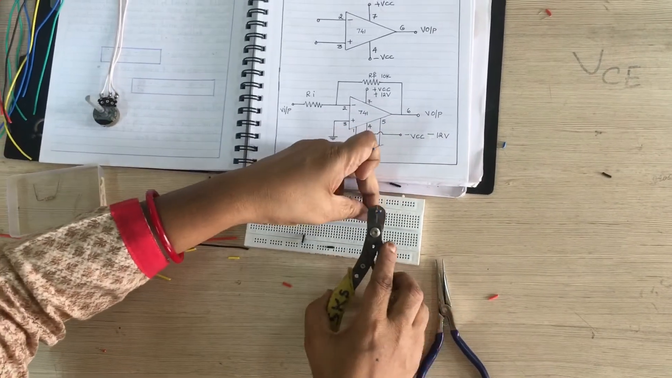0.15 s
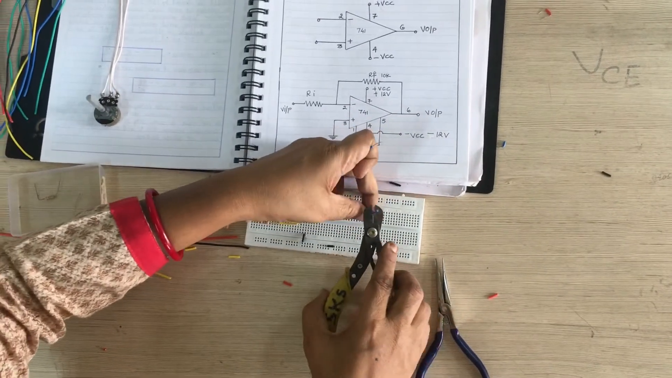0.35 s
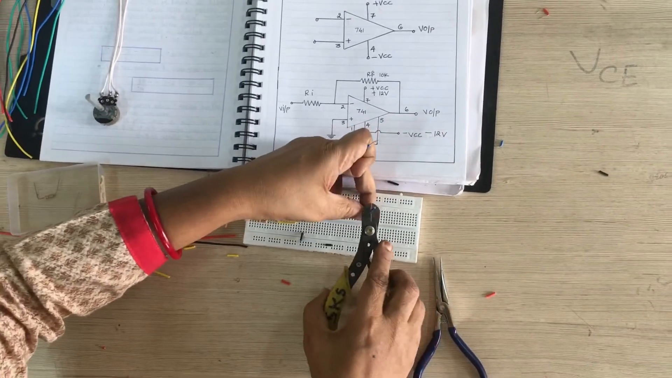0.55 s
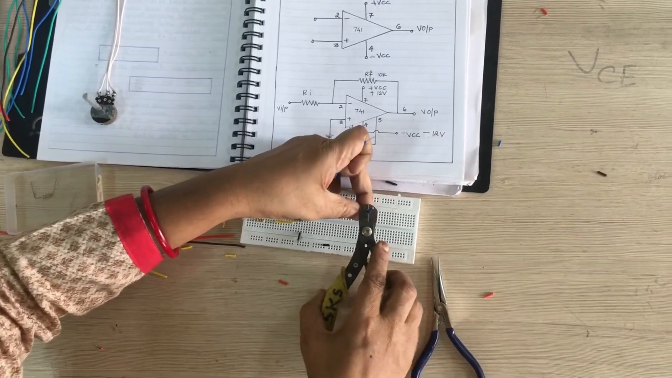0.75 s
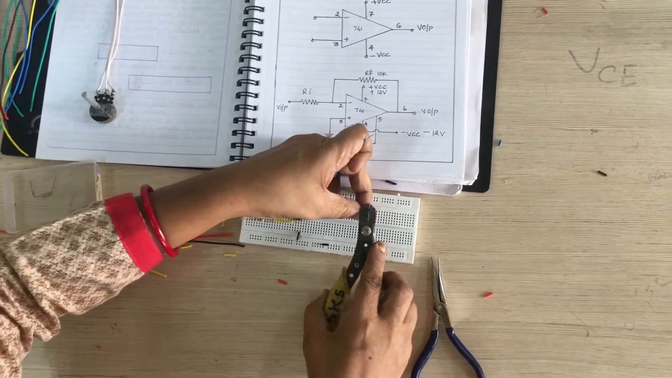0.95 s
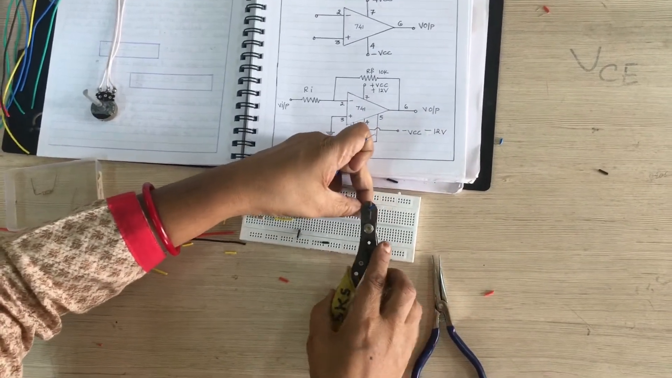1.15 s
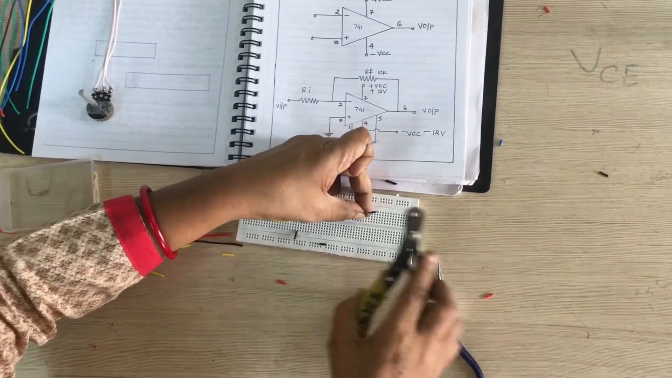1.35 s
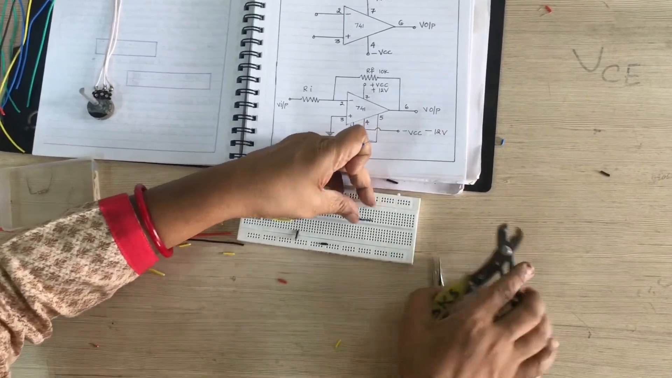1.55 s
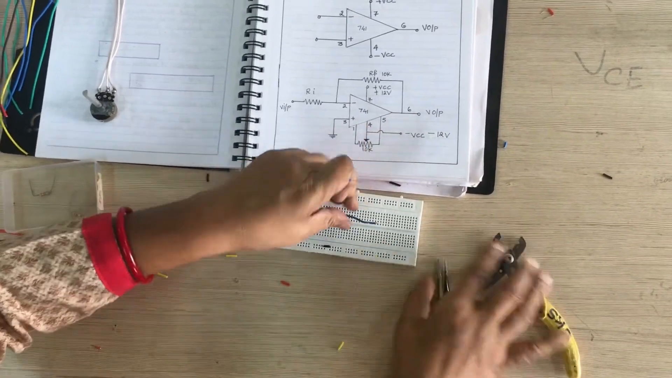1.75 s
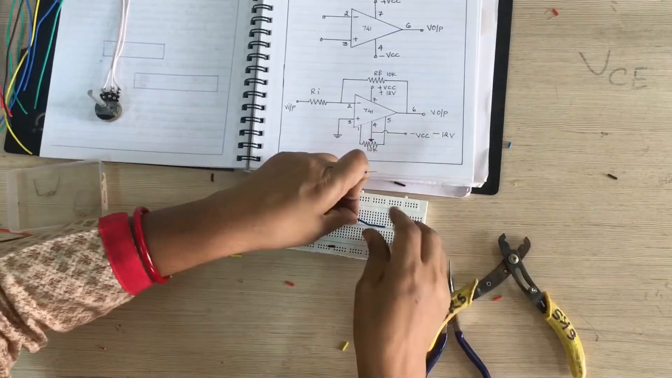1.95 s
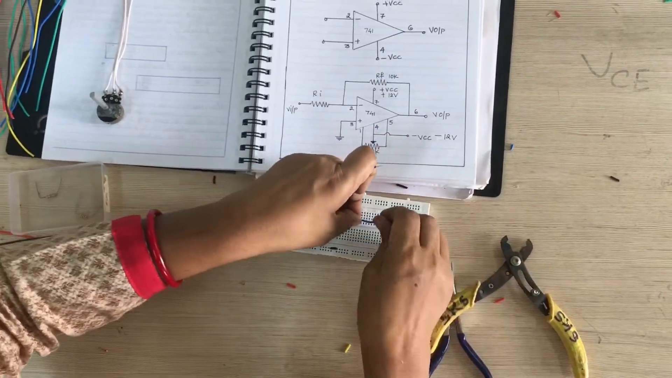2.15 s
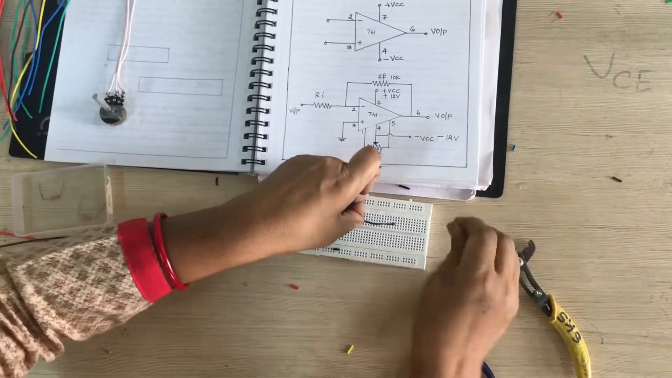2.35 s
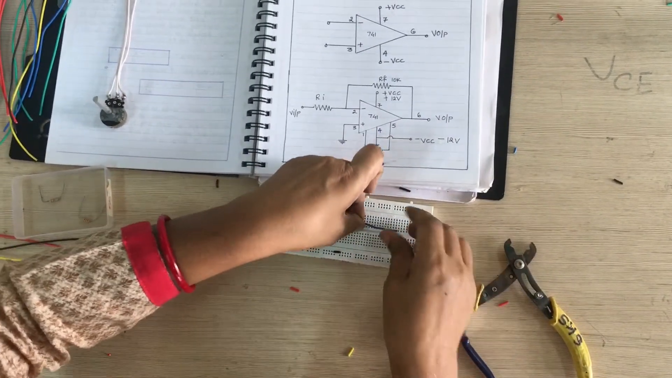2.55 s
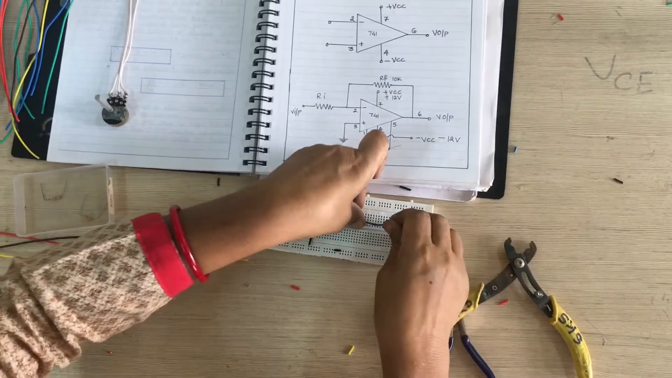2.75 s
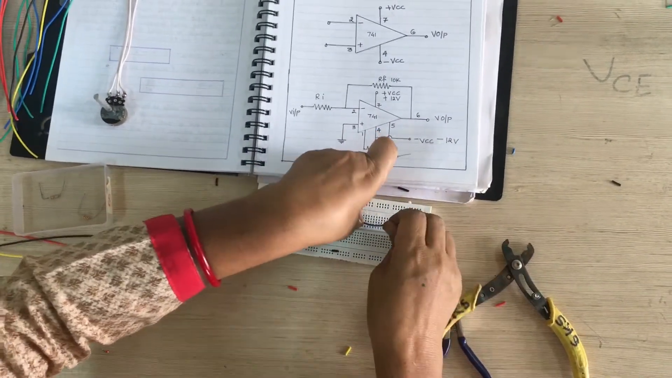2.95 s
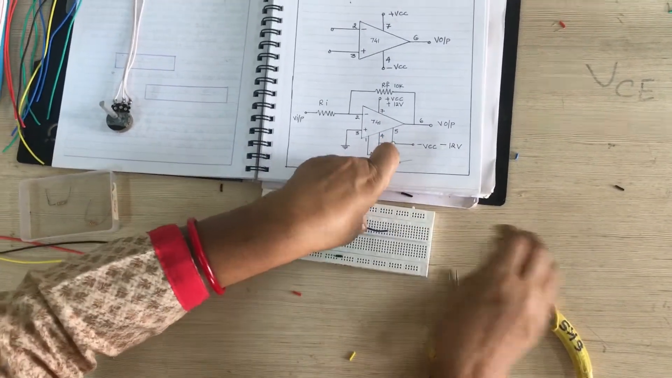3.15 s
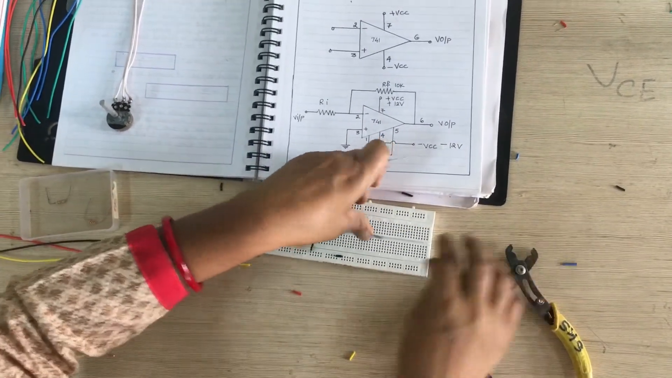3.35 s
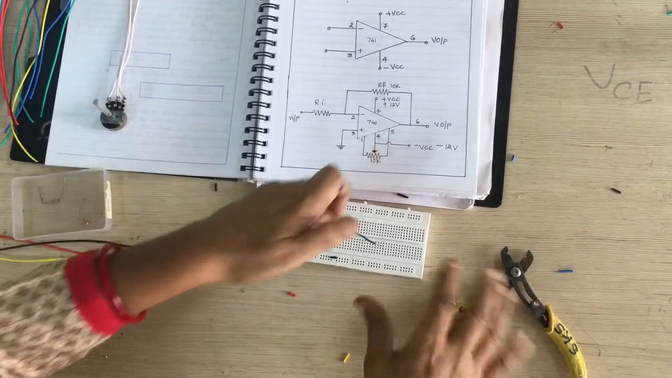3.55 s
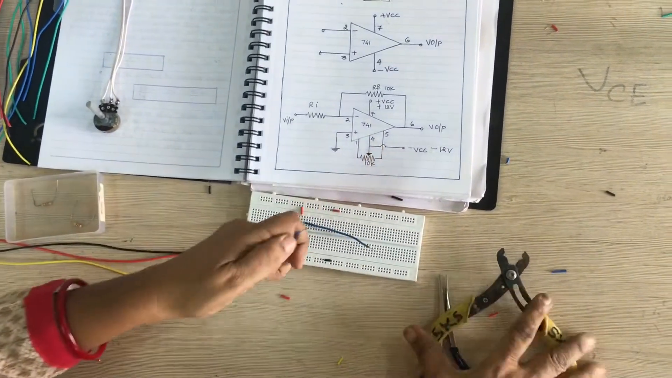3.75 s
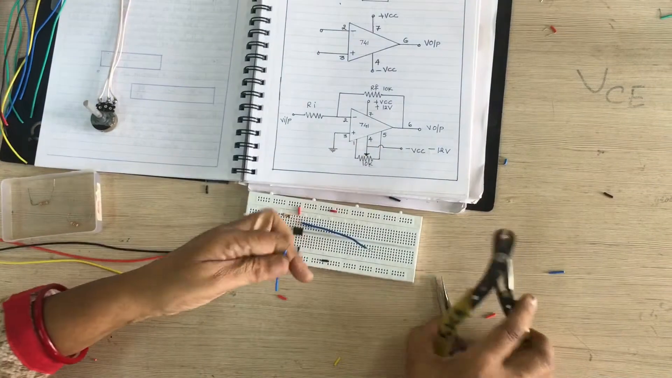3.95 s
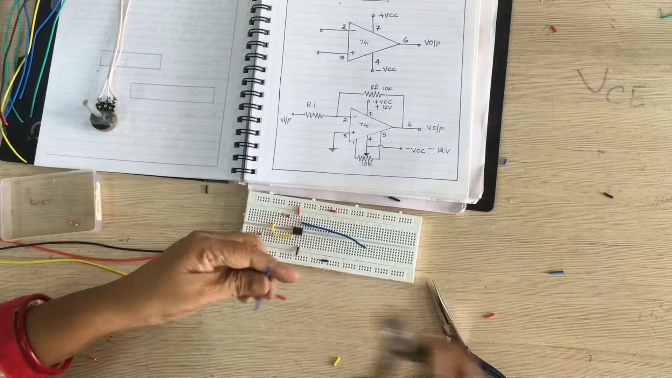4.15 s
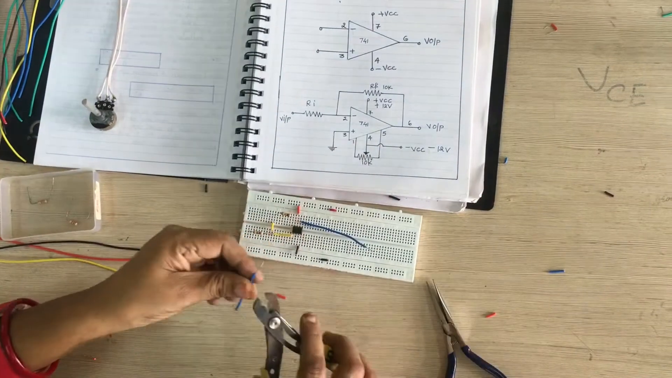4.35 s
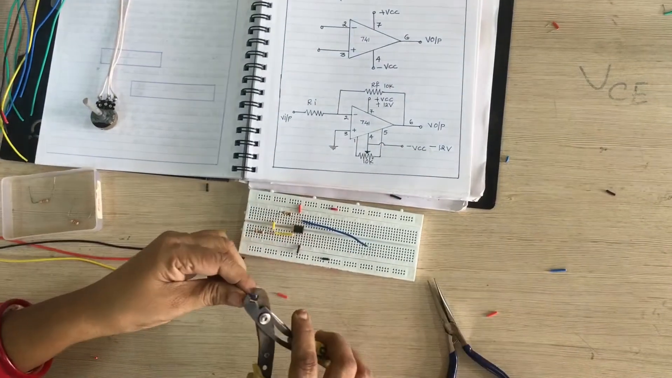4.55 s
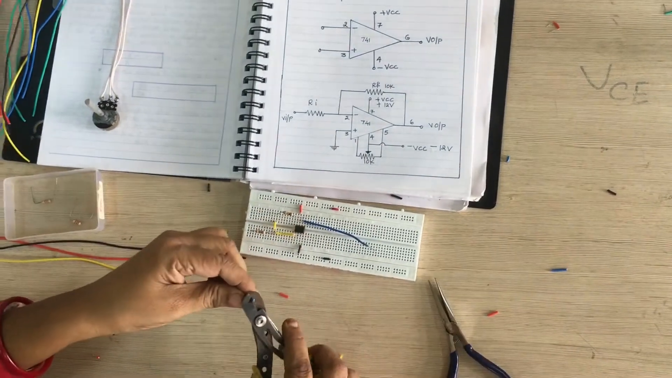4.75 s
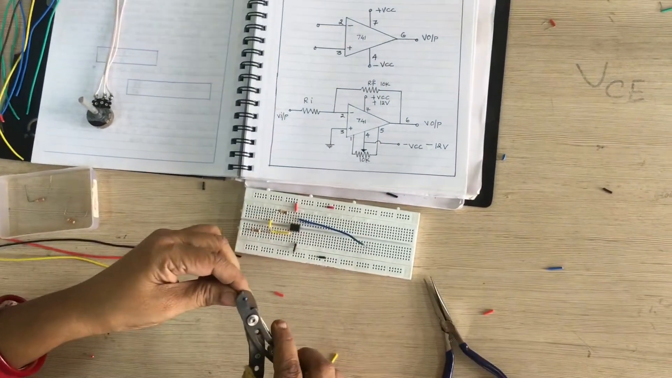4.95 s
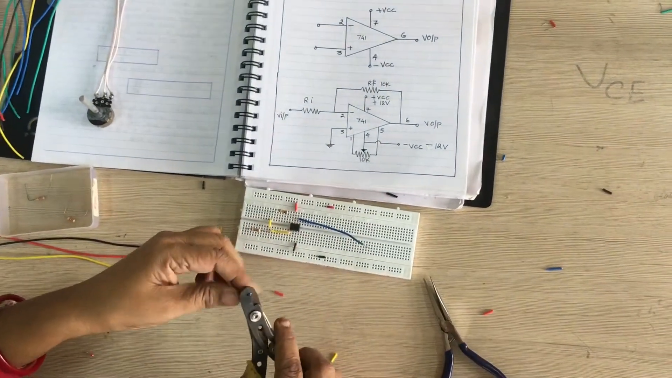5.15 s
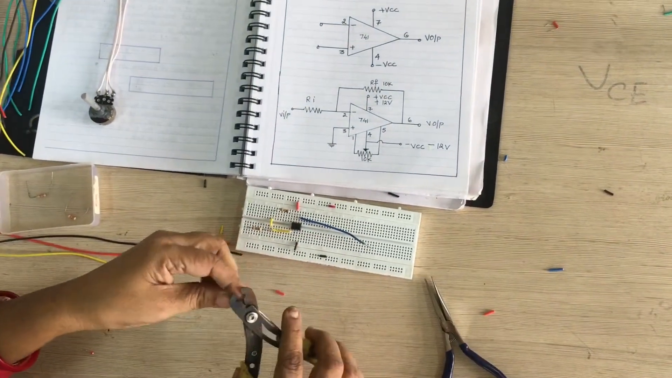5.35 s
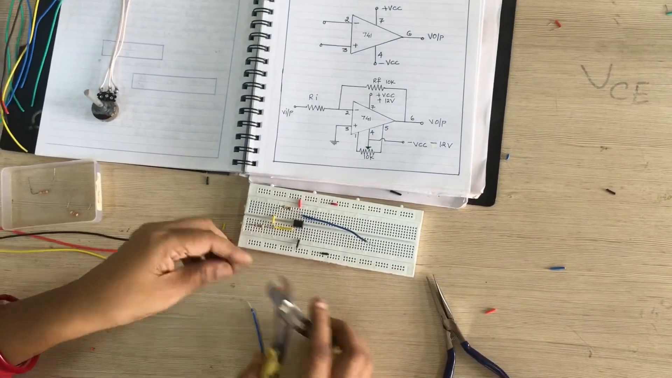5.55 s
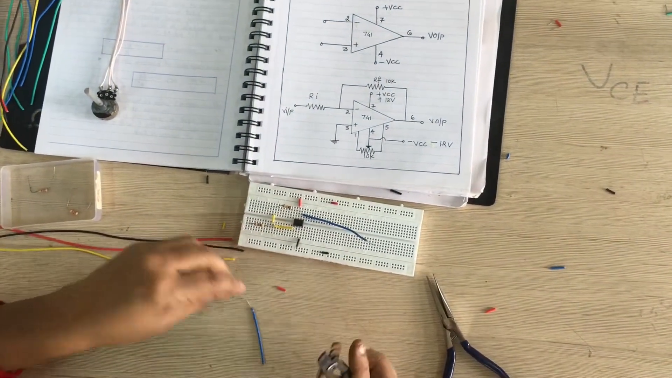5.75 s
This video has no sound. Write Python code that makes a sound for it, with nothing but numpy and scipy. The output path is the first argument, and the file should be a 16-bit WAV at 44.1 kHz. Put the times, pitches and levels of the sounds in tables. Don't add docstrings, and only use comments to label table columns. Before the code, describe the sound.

In an echoing room with a steady fan, a hand tool clatters onto wood, is handled and picked up, then snips wire as a distant horn sounds.

```python
import sys
import numpy as np
from scipy import signal
from scipy.fft import rfft, irfft
from scipy.io import wavfile
from scipy.ndimage import uniform_filter1d, map_coordinates

SR = 44100
rng = np.random.default_rng(int(sys.argv[2]) if len(sys.argv) > 2 else 0)


def wav_record(signal):
    frames = np.transpose(np.atleast_2d(signal))
    bounded = np.clip(frames, -1, 1)
    quanta = np.round(bounded * 32767).astype(np.int16)
    wavfile.write(sys.argv[1], SR, quanta)


def convert_level_to_amplitude(level_db):
    exponent = np.asarray(level_db, float) / 20
    return 10 ** exponent


N = 259749

# (frequency [Hz], level [dB per Hz])
FAN_SPECTRUM = [(20, -59), (32, -39), (40, -7), (50, -26), (62, -15), (75, 4.5), (88, -7), (115, -4.5),
                (130, -4), (160, -7.5), (215, -14.5), (260, -14), (330, -17.5), (1500, -29)]
# (frequency [Hz], level [dB per Hz])
HISS_SPECTRUM = [(880, -61), (1500, -3), (2090, -5), (2500, -10), (2940, -13.5), (3810, -16), (4800, -21.5),
                 (5700, -20), (7700, -23.5), (8950, -21.5), (10200, -26.5), (11600, -23.5), (15100, -28),
                 (16000, -24), (16500, -54)]
# (multiple of the fundamental [1], level [dB])
HORN_PARTIALS = [(8, 0.5), (9, -8), (10, -9)]
# (peak time [s], level [dB], rise [s], fall [s])
HORN_BLASTS = [
    (5.268, -68, .06, .15),
    (5.33, -64, .12, .1),
    (5.382, -59, .1, .1),
    (5.466, -62, .05, .11),
    (5.6, -73, .15, 0.16),
    (5.724, -74, .04, .08),
]
# (peak time [s], level [dB], rise [s], fall [s])
RUBS = [(1.2, -66, .04, .07), (1.37, -70, .05, 0.5), (2.16, -69, .065, .1), (3.094, -55.5, .022, .022),
        (3.24, -68, .055, .15), (3.732, -57, .03, .08), (3.79, -65, .14, .3), (3.885, -70, .1, .09),
        (4.01, -64, .05, 0.1), (4.033, -55, .015, .01), (5.19, -68.5, .22, .17)]
# (frequency [Hz], level [dB per Hz])
RUB_SPECTRUM = [(2000, -19), (4000, -4), (6500, -1), (9000, 0.5), (12000, -2), (16500, -7)]
# (peak time [s], level [dB], rise [s], fall [s])
SHAKES = [(1.63, -32.5, .22, 0.46), (1.828, -37, .2, 0.063), (2.0, -50, 0.34, 0.039), (2.1, -51, .08, .3),
          (3.674, -35, 0.074, 0.19), (3.84, -37.5, 0.18, 0.14), (4.048, -38, .04, 0.017)]
# (frequency [Hz], level [dB per Hz])
SHAKE_SPECTRUM = [(30, -41), (55, 4), (76, 8.5), (110, -5.5), (150, -4), (280, -3.5), (400, -9), (550, -35),
                  (900, -43), (2000, -120)]
# (peak time [s], level [dB], rise [s], fall [s])
SQUEAKS = [
    (3.9, -62, .05, .05),
    (3.95, -72, .05, .16),
]

# (frequency [Hz], level [dB], decay t60 [s])
BENCH_MODES = [(76, -31, 0.28), (306, -18, 0.18), (386, -15, 0.017), (464, -18, 0.086), (625, -13.5, 0.051),
               (735, 1.5, 0.063), (860, -2, 0.041), (1078, -6.5, 0.04), (1200, -10.5, 0.01),
               (1299, 2, 0.024), (1470, -1, 0.035), (1690, -2.5, 0.037), (1785, -24.5, 0.11),
               (1960, -7.5, 0.034), (2196, -9.5, 0.056), (2490, -2.5, 0.016), (2860, -5, 0.01),
               (2820, -2, 0.03), (2970, -38, 0.0067), (3800, -9, .015), (3960, -10, 0.018),
               (4500, -11, 0.013)]
# (frequency [Hz], level [dB], decay t60 [s])
STEEL_MODES = [(1400, -3, .004), (2120, -4, .004), (2670, 0, 0.0039), (3140, 1, 0.0065), (4330, 1, 0.0066),
               (4980, 5, 0.002), (5560, 6, 0.0035), (6484, 7.5, 0.0026), (7440, -6, 0.004),
               (8070, 0, 0.0024), (9630, 2.5, 0.007), (10700, 0, 0.0018), (11590, 7, 0.0027),
               (12150, 9, 0.0038), (13030, 9, 0.0026), (14000, 3, 0.0025), (15100, 3, 0.0036),
               (16000, -7, .003)]
KNOCK_ZONES_HZ = [745, 400, 1250, 1850, 3000]
TICK_ZONES_HZ = [9300, 3800, 6200, 12200, 15000]

HANDLE_COLOUR = [-9, -8, -15.5, -15]
SHANK_COLOUR = [-14, -1, -2.5, -15]
HEAD_COLOUR = [-2, 7.5, -2, -24]
END_COLOUR = [-15, -14, -14, -17]
HEEL_COLOUR = [-21, -2, 12, -4]
# (time [s], peak level [dB], hardness [dB per octave])
HANDLE_BLOWS = [(1.616, -35, -1), (1.6813, -7, 2), (1.703, -20, 1.5), (1.709, -23, -1), (3.869, -24, -1)]
SHANK_BLOWS = [(1.604, -23, -1), (3.6568, -22, -0.5), (3.875, -31, 1)]
HEAD_BLOWS = [(3.645, -36, -7), (3.679, -35, -1), (3.692, -37, 0)]
END_BLOWS = [
    (1.5128, -15.5, 0),
]
HEEL_BLOWS = [
    (1.592, -27.5, 0),
]

TIP_COLOUR = [-14, -13.5, -17, -18]
CLASH_COLOUR = [-4, -7, -9.5, -7]
NICK_COLOUR = [7, 1, -13, -14]
SNAP_COLOUR = [-17, -7, -0.5, -15]
SLAP_COLOUR = [-13, 4.5, -11, -7]
RING_COLOUR = [-34, -8, -9, -25]
CATCH_COLOUR = [-8, 8, -12, -3]
# (time [s], peak level [dB], hardness [dB per octave])
TIP_PINGS = [(.9323, -50, 0), (.9567, -49, 2), (.9674, -49, 1), (1.0866, -42, -2), (1.638, -31, 6),
             (1.6654, -28, -3), (1.668, -43, -5), (1.681, -18.5, 3), (1.7, -33, 5), (1.724, -35, 2),
             (1.743, -39, 0), (1.758, -40, 2), (3.642, -45, 6), (3.6448, -30, 6)]
# (time [s], peak level [dB], hardness [dB per octave])
JAW_CLASHES = [(1.5915, -30.5, -1), (1.595, -28.5, 1), (1.604, -44, 1), (2.63, -58, -5), (2.635, -59, -1),
               (3.2091, -44, 1), (3.213, -42.5, 0), (3.6568, -30, 2), (5.3203, -37, -1), (.838, -58, 0)]
# (time [s], peak level [dB], hardness [dB per octave])
BLADE_NICKS = [(1.1297, -63, 0), (1.2246, -59, -3), (5.1136, -54, 3)]
# (time [s], peak level [dB], hardness [dB per octave])
WIRE_SNAPS = [(1.685, -31, 6), (1.69, -38, 5), (5.3462, -21, 0), (5.358, -42, 4), (5.368, -39, 4),
              (5.381, -41, 4), (5.467, -50, -3)]
# (time [s], peak level [dB], hardness [dB per octave])
HANDLE_SLAPS = [(5.399, -43, 5), (5.4769, -37, 3), (5.498, -54, 0), (5.8478, -57, -2)]
# (time [s], peak level [dB], hardness [dB per octave])
SPRING_RINGS = [
    (1.6345, -24, 0),
]
LATCH_CATCHES = [
    (5.8526, -37, 0),
]

# (frequency [Hz], decay t60 [s], tail level [dB])
ROOM_TAIL = [(60.1, 0.56, -9), (300, 1.2, -1.5), (1040, 1.335, 2), (3000, 1.12, -0.5), (4400, 1.0, -1.5),
             (5600, 0.93, 0), (6400, 0.78, 0.5), (7800, .7, -6), (9300, 0.75, -5.5), (10500, 0.69, -8),
             (11800, .53, 3), (14070, .45, 0), (16500, 0.33, -8)]
# (delay [s], level [dB])
ECHOES = [
    (.0072, -17.5),
    (.019, -21),
    (0.0207, -23),
]


def rms_one(x):
    return x / np.sqrt(np.mean(x ** 2) + 1e-20)


def at_hz(points, hz, axis=1):
    points = np.array(points)
    return np.interp(np.log(hz), np.log(points[:, 0]), points[:, axis])


def drift(rate):
    knots = rng.standard_normal(int(N / SR * rate) + 3)
    return rms_one(map_coordinates(knots, [np.arange(N) / SR * rate], order=3))


def coloured(spectrum):
    hz = np.arange(1, N // 2 + 2) * SR / N
    white = rfft(rng.standard_normal(N))
    return rms_one(irfft(white * convert_level_to_amplitude(at_hz(spectrum, hz)), N))


def swells(rows):
    t = np.arange(N) / SR
    total = np.zeros(N)
    for s, level_db, rise, fall in rows:
        away = np.maximum((s - t) / rise, (t - s) / fall)
        total += convert_level_to_amplitude(level_db - 25 * away)
    return total


def fan():
    spectrum = FAN_SPECTRUM + [(1950, -53), (3300, -120)]
    return convert_level_to_amplitude(-42 + 0.068 * drift(0.32)) * coloured(spectrum)


def hiss():
    return convert_level_to_amplitude(-61.5) * coloured(HISS_SPECTRUM)


def horn():
    turns = 2 * np.pi * 334 * np.arange(N) / SR
    tone = np.zeros(N)
    for multiple, level_db in HORN_PARTIALS:
        wavering = convert_level_to_amplitude(level_db + 2 * drift(30))
        tone += wavering * np.sin(round(multiple) * turns + drift(11) / 2)
    return swells(HORN_BLASTS) * convert_level_to_amplitude(5.0) * tone


def shaking():
    effort = uniform_filter1d(swells(SHAKES), size=SR // 50)
    return effort * convert_level_to_amplitude(2.2 * drift(15)) * coloured(SHAKE_SPECTRUM)


def rubbing():
    return swells(RUBS) * convert_level_to_amplitude(0.5 * drift(300)) * coloured(RUB_SPECTRUM)


def squeak():
    start_s, end_hz, excess_hz, sag_s = 3.878, 3050, 597, .018
    elapsed = np.maximum(np.arange(N) / SR - start_s, 0)
    hz = end_hz + excess_hz * np.exp(-elapsed / sag_s)
    turns = 2 * np.pi * np.cumsum(hz * (1 + .02 * drift(500))) / SR
    tone = convert_level_to_amplitude(-1.0) * np.sin(turns) + np.sin(2 * turns)
    return swells(SQUEAKS) * convert_level_to_amplitude(4.5 * drift(110)) * tone


def room(close, spread_out):
    t = np.arange(round(1.4 * SR)) / SR
    hz, s, cells = signal.stft(rng.standard_normal(len(t)), SR, nperseg=256)
    level_db = at_hz(ROOM_TAIL, hz + 1, axis=2)[:, None]
    t60 = at_hz(ROOM_TAIL, hz + 1)[:, None]
    cells *= convert_level_to_amplitude(level_db - 60 * s / t60)
    tail = signal.istft(cells, SR, nperseg=256)[1][:len(t)]
    build_up = 1 - np.exp(-(t / .009) ** 2)
    tail *= convert_level_to_amplitude(-4.5) * build_up / np.sqrt(SR / 20)
    echoes = sum(convert_level_to_amplitude(echo_db) * np.roll(close, round(delay * SR)) for delay, echo_db in ECHOES)
    return close + echoes + signal.fftconvolve(spread_out, tail)[:N]


def blows(kinds, zones_hz):
    octaves = np.log2(np.array(zones_hz[1:]) / zones_hz[0])
    rows = []
    for events, colour_db in kinds:
        for s, level_db, hardness in events:
            rows.append((s, level_db, *(colour_db + hardness * octaves)))
    return sorted(rows)


def struck(events, zones_hz, modes, contact_s, chatter, soft_hz, spread, offset_db, count):
    zone_lift_db = 6
    smear = 0.28
    t = np.arange(SR // 100) / SR
    pushes = chatter * rng.standard_normal((len(events), len(t))) * np.exp(-t / contact_s)
    pushes[:, 0] = 1
    grips = 1 + spread * rng.standard_normal((len(events), len(modes)))
    out = np.zeros((2, N))
    for (s, peak_db, *zone_db), push, grip in zip(events, pushes, grips):
        at = round(s * SR)
        colour = sorted(zip(zones_hz, [0] + [db + zone_lift_db for db in zone_db]))
        force = np.pad(push, (0, SR // 2))[:N - at]
        for k, (hz, level_db, t60) in enumerate(modes):
            w = 2 * np.pi * hz * grip[k] / SR
            side = (-1) ** (k // count + 1)
            gain = side * convert_level_to_amplitude(offset_db + peak_db + level_db + at_hz(colour, hz))
            held = np.abs(push @ np.exp(1j * w * np.arange(len(t)))) + 0.43
            span = min(len(force), len(t) + round(t60 * SR))
            click = side * (-1) ** k * signal.unit_impulse(span)
            for row, (share, drive) in enumerate([(1, force[:span] / held), (smear, click)]):
                r = convert_level_to_amplitude(-60 / (share * t60 * SR))
                ring = signal.lfilter([0, np.sin(w)], [1, -2 * r * np.cos(w), r * r], drive)
                out[row, at:at + span] += gain * ring / np.sqrt(share)
    soft_contact = signal.butter(2, min(soft_hz, .45 * SR), fs=SR, output="sos")
    return signal.sosfilt(soft_contact, out)


def knocks():
    kinds = [(HANDLE_BLOWS, HANDLE_COLOUR), (SHANK_BLOWS, SHANK_COLOUR), (HEAD_BLOWS, HEAD_COLOUR),
             (END_BLOWS, END_COLOUR), (HEEL_BLOWS, HEEL_COLOUR)]
    return struck(blows(kinds, KNOCK_ZONES_HZ), KNOCK_ZONES_HZ, BENCH_MODES, contact_s=.0016,
                  chatter=.2, soft_hz=4200, spread=.006, offset_db=-4, count=3)


def ticks():
    kinds = [(TIP_PINGS, TIP_COLOUR), (JAW_CLASHES, CLASH_COLOUR), (BLADE_NICKS, NICK_COLOUR),
             (WIRE_SNAPS, SNAP_COLOUR), (HANDLE_SLAPS, SLAP_COLOUR),
             (SPRING_RINGS, RING_COLOUR), (LATCH_CATCHES, CATCH_COLOUR)]
    rings = struck(blows(kinds, TICK_ZONES_HZ), TICK_ZONES_HZ, STEEL_MODES, contact_s=0.00044,
                   chatter=0.45, soft_hz=19050, spread=0.013, offset_db=-3.0, count=1)
    rings[0] += convert_level_to_amplitude(-8.0) * np.roll(rings[0], round(0.001198 * SR))
    return rings


def scene():
    background = fan() + hiss() + horn()
    handling = shaking() + rubbing() + squeak()
    close, spread_out = knocks() + ticks()
    return (background + handling + room(close, spread_out))[None]


def low_pass(x):
    return signal.sosfilt(signal.butter(12, 16780, fs=SR, output="sos"), x)


def record(dry):
    top = signal.cheby2(10, 60, 17200, fs=SR, output="sos")
    mix = signal.sosfilt(top, dry)
    return low_pass(mix)


dry = scene()
out = record(dry)
wav_record(out)
```